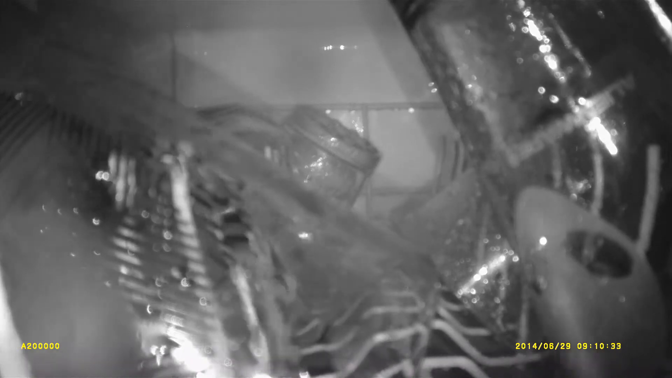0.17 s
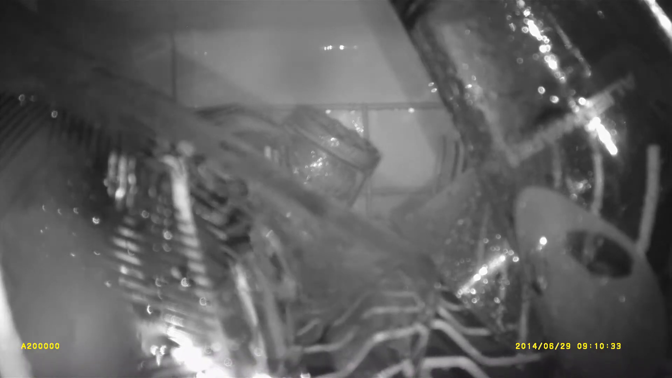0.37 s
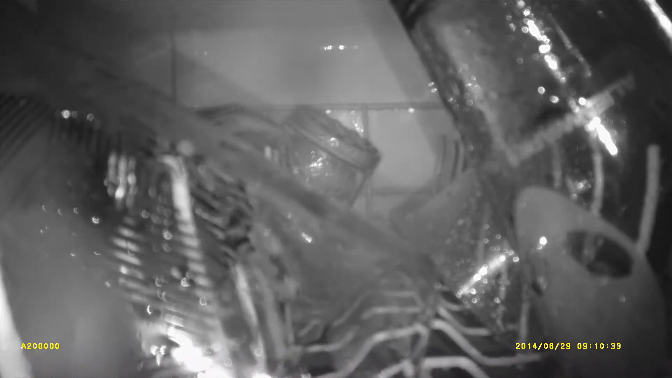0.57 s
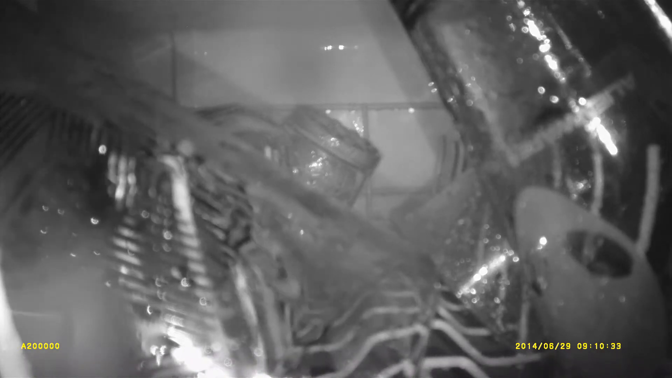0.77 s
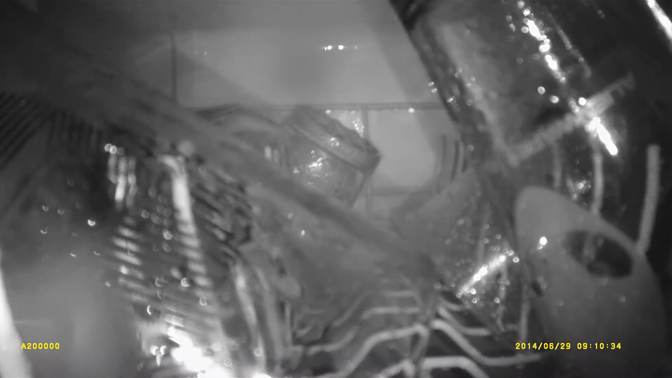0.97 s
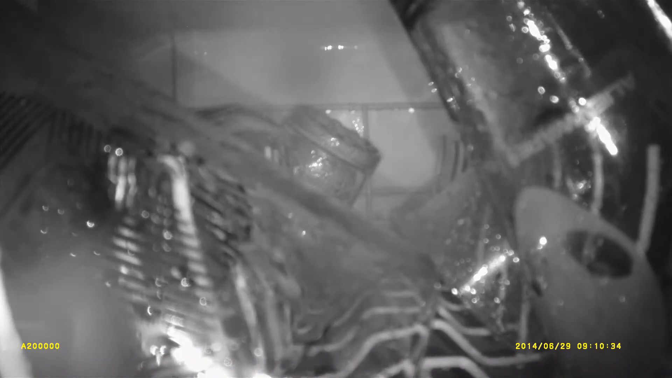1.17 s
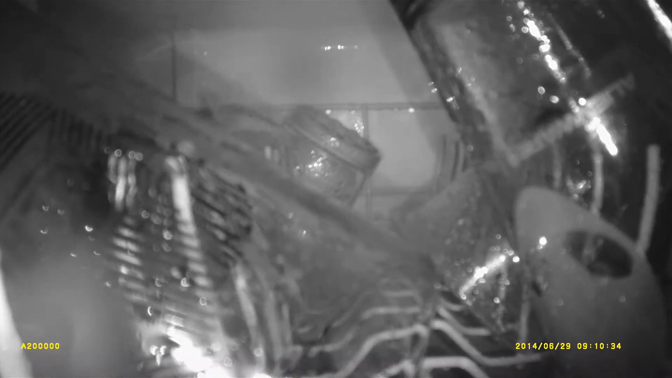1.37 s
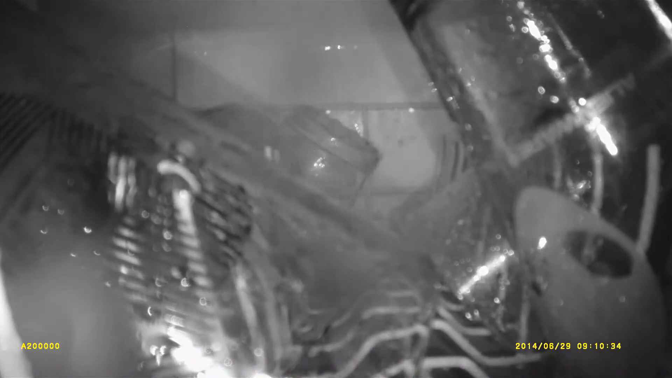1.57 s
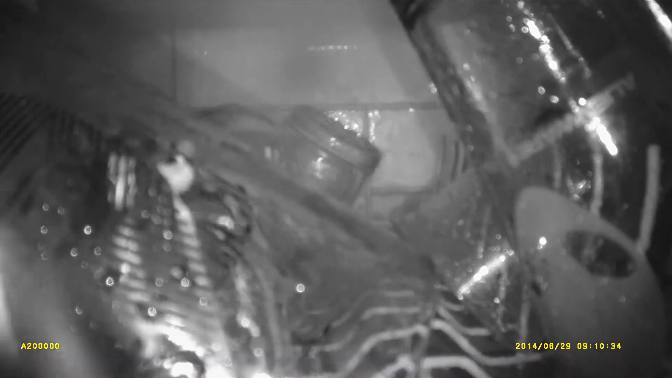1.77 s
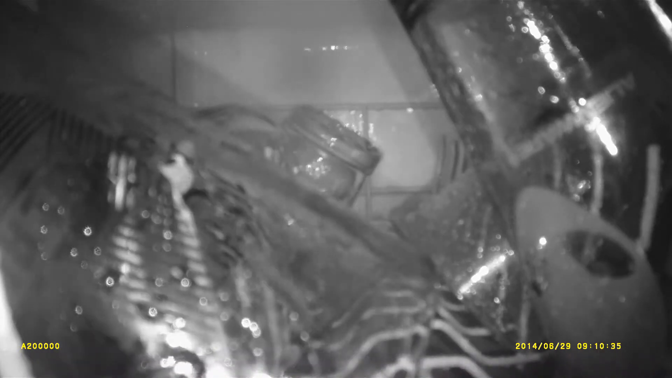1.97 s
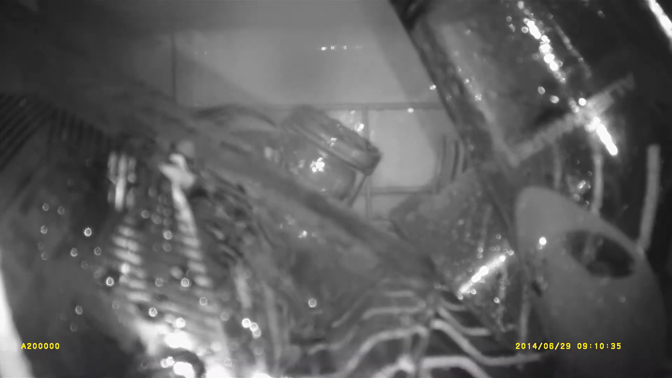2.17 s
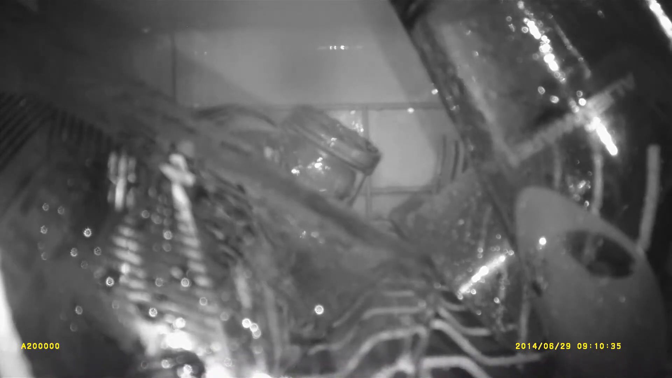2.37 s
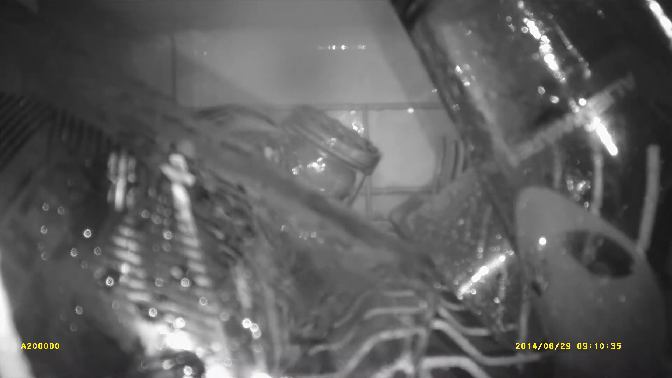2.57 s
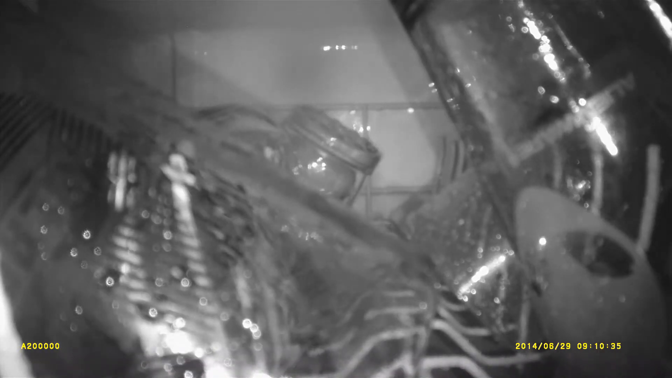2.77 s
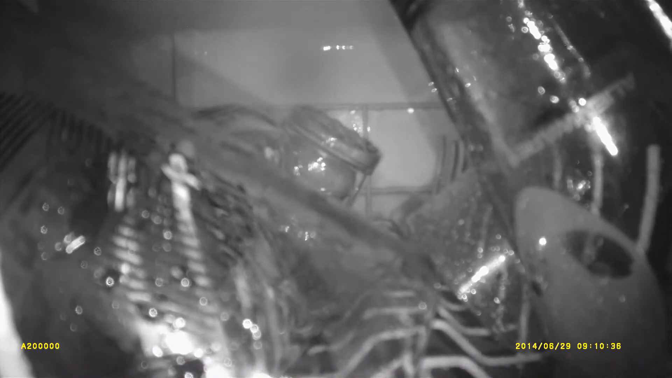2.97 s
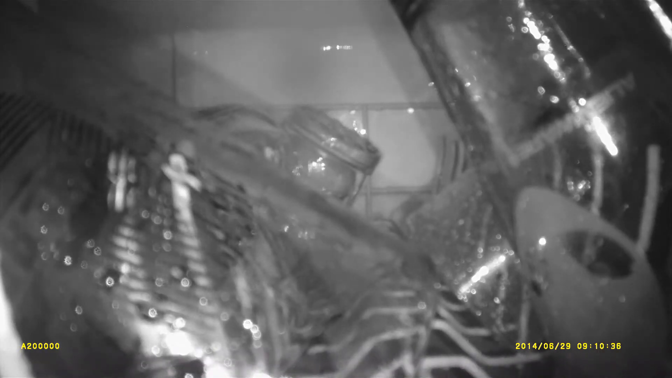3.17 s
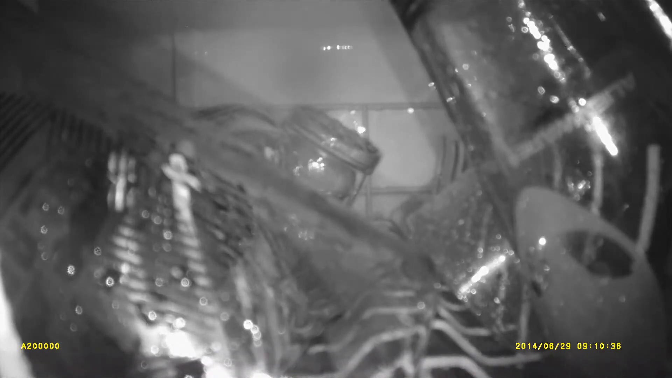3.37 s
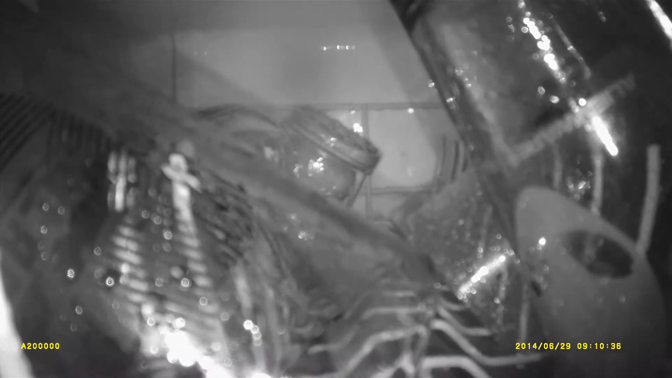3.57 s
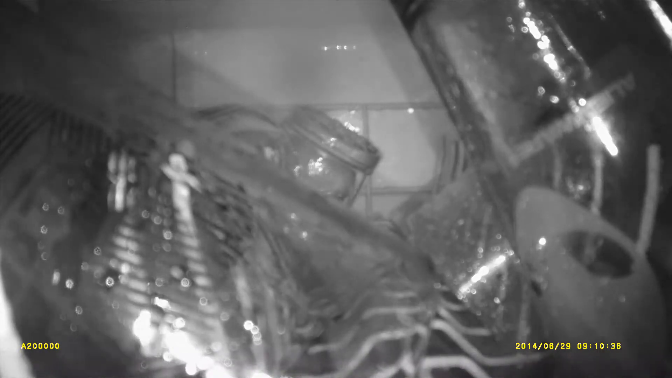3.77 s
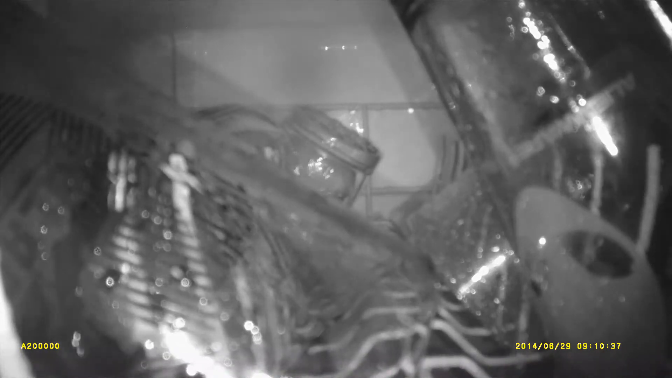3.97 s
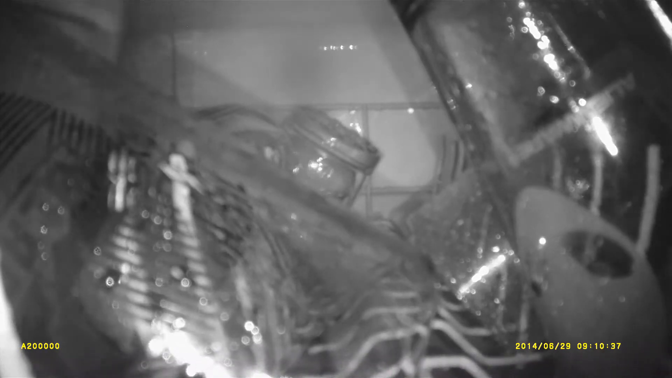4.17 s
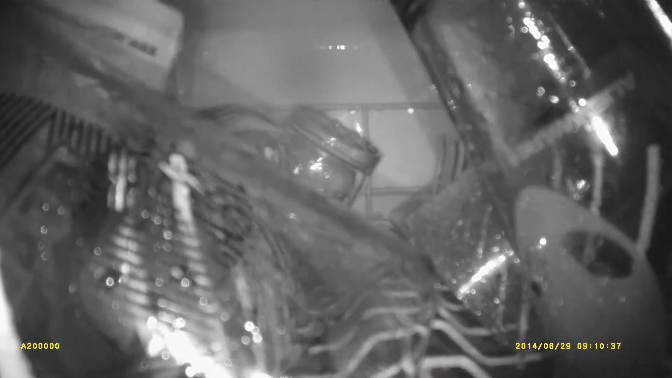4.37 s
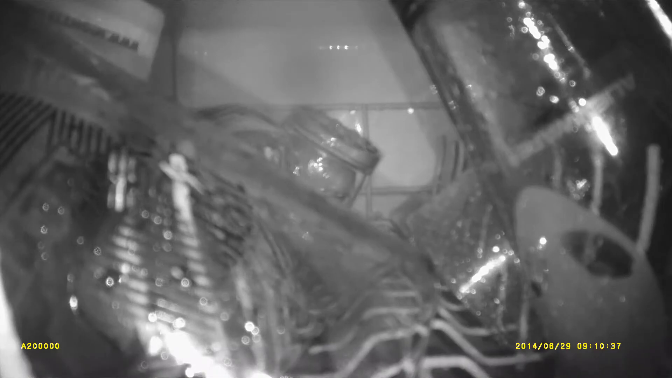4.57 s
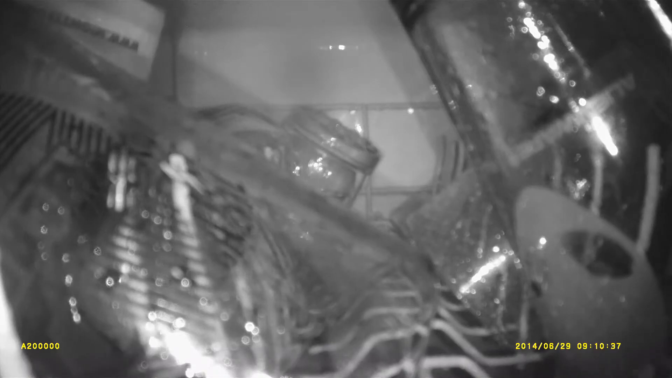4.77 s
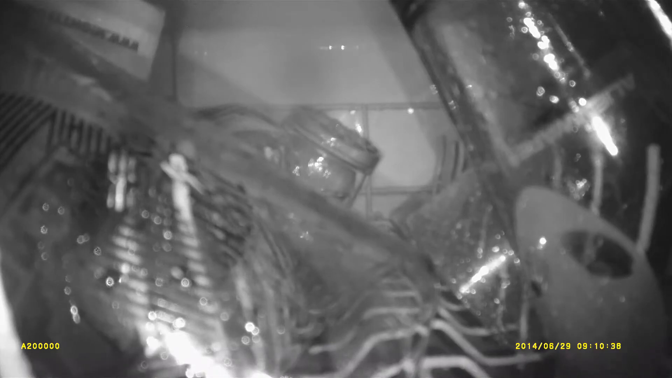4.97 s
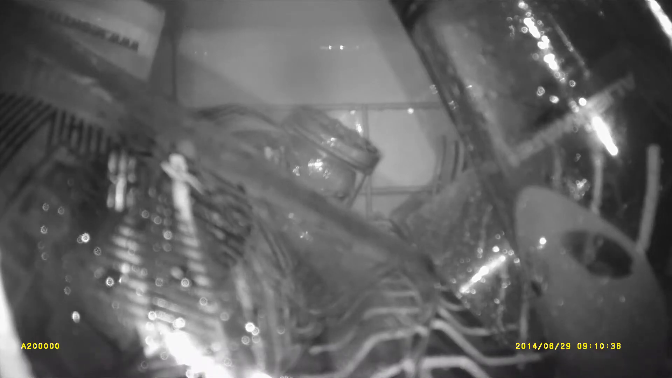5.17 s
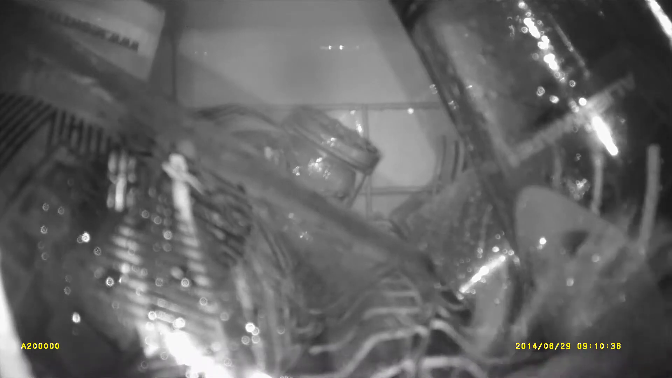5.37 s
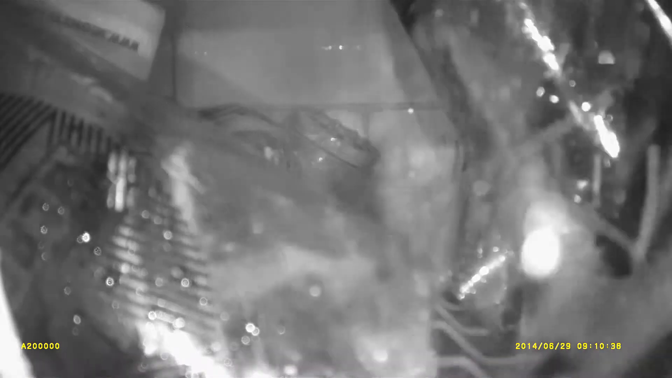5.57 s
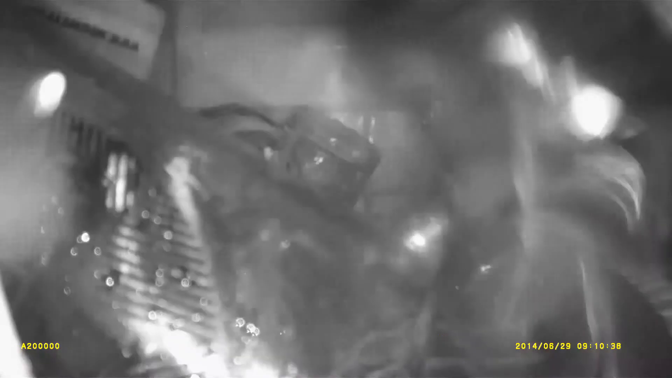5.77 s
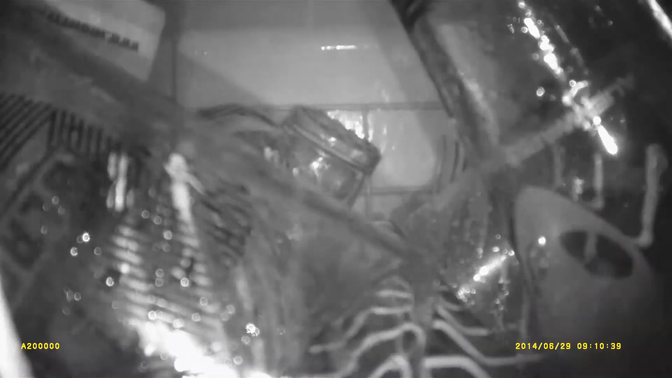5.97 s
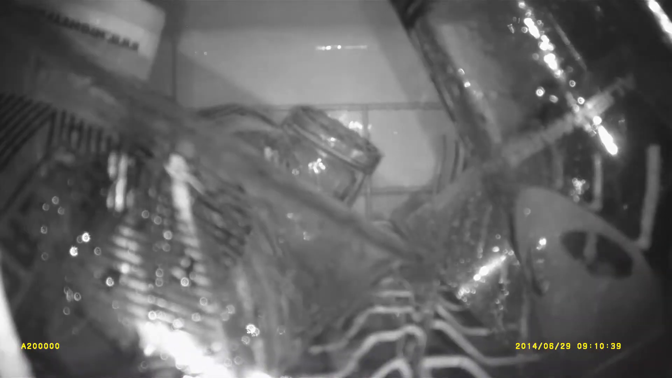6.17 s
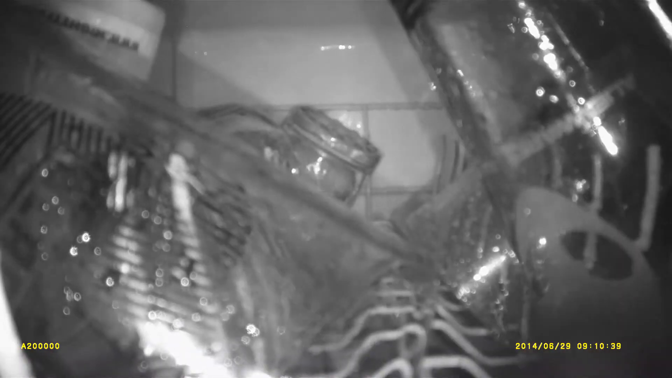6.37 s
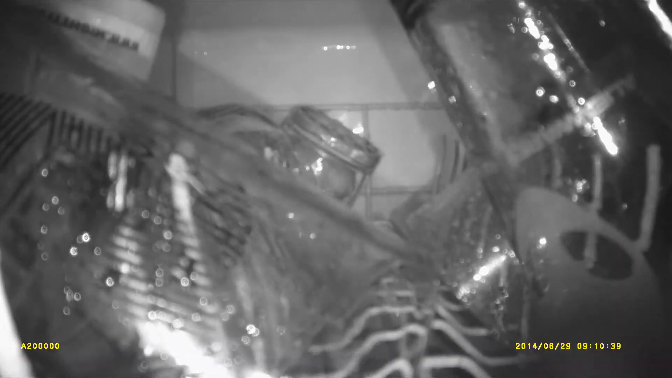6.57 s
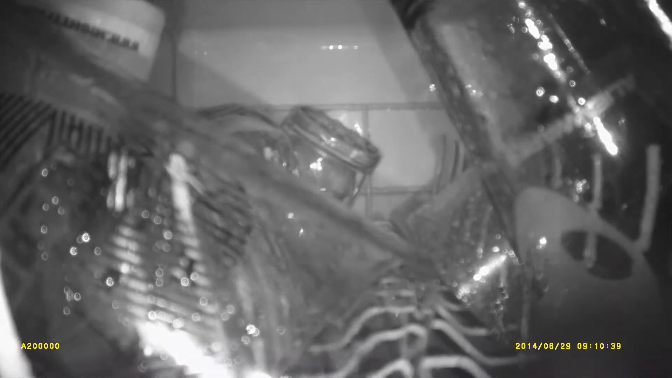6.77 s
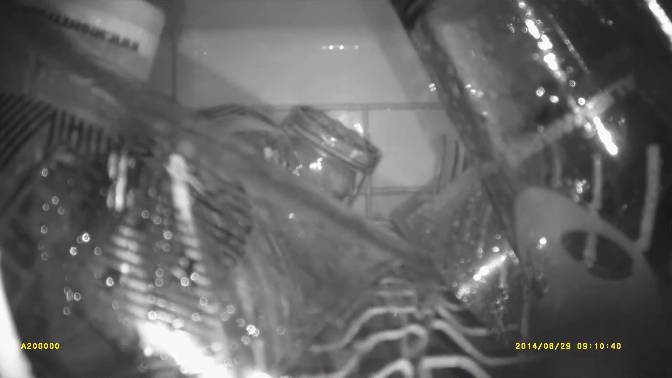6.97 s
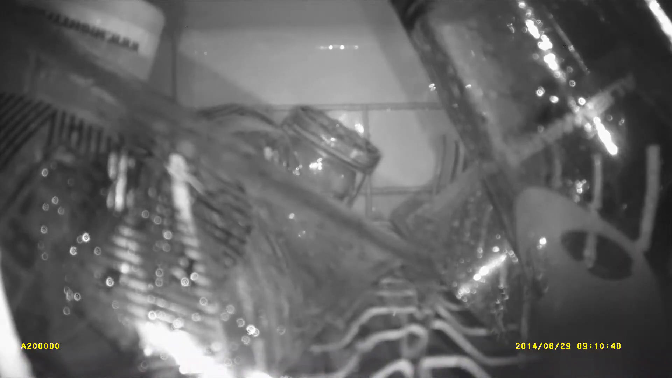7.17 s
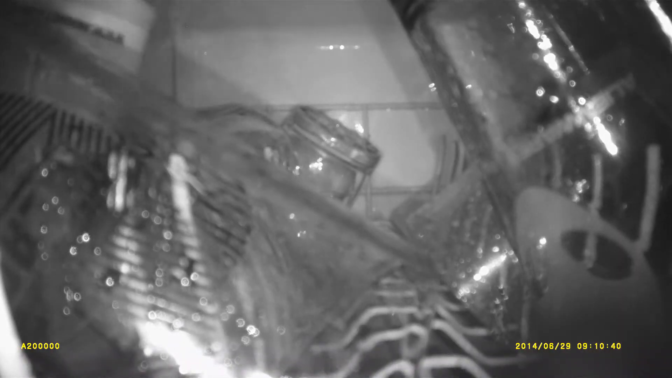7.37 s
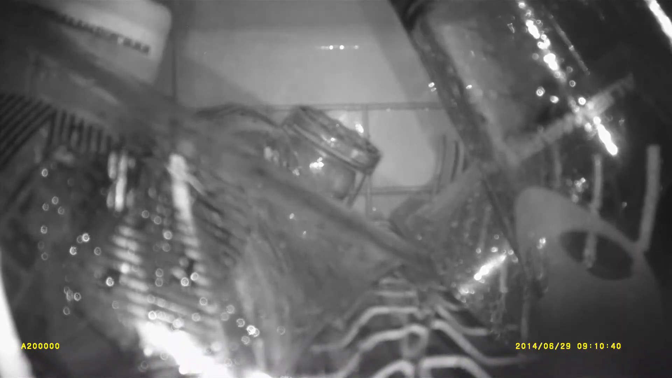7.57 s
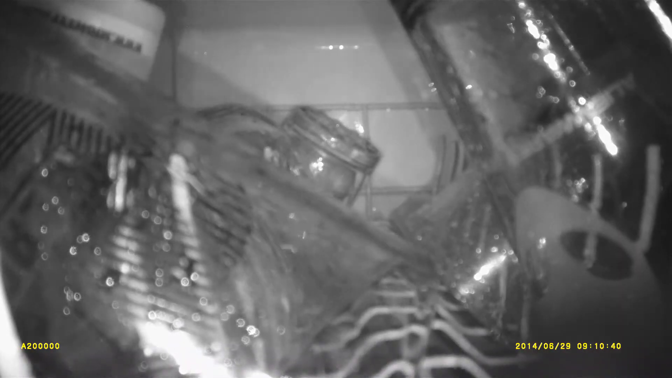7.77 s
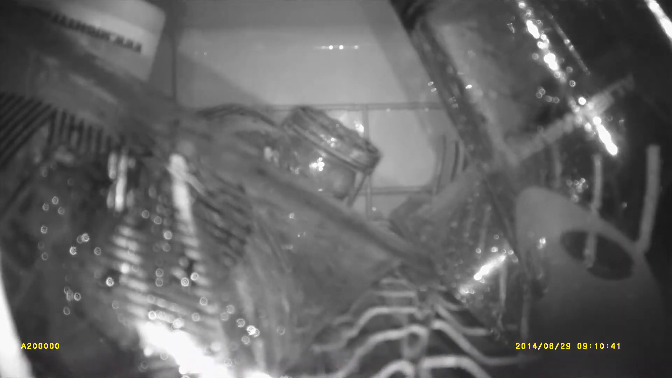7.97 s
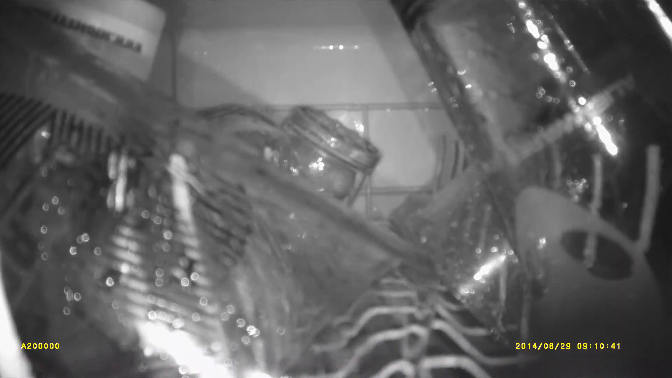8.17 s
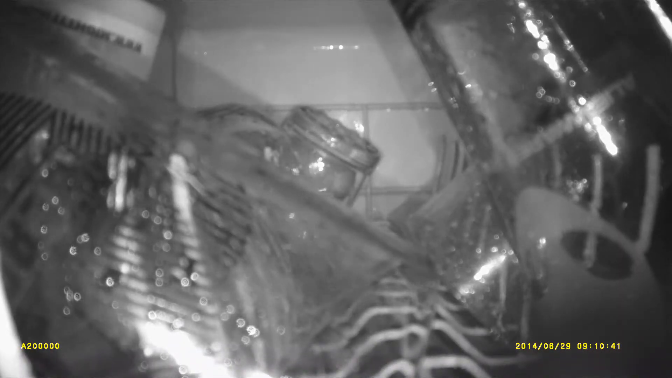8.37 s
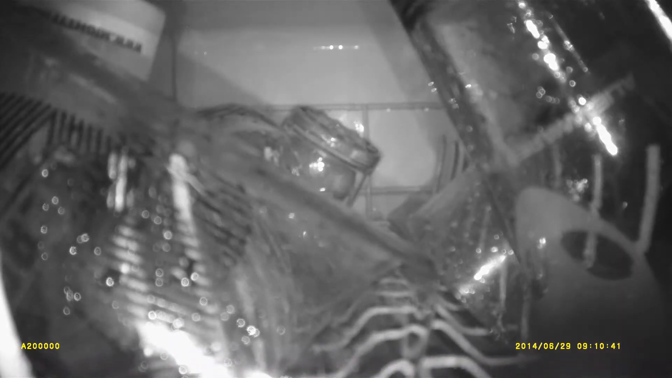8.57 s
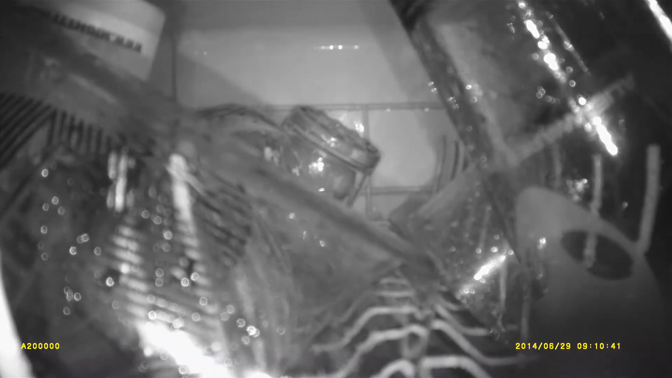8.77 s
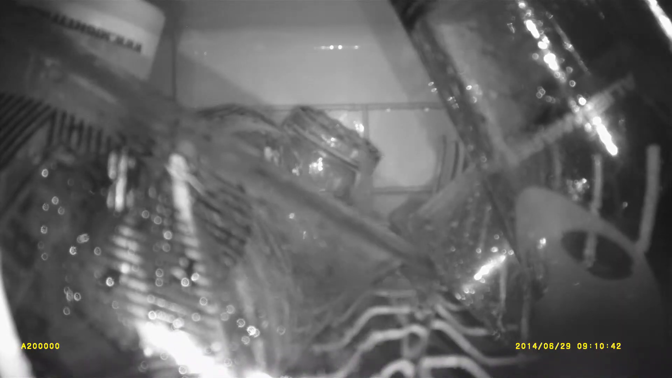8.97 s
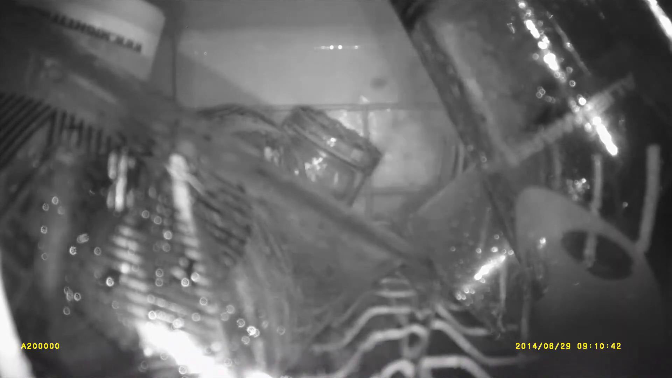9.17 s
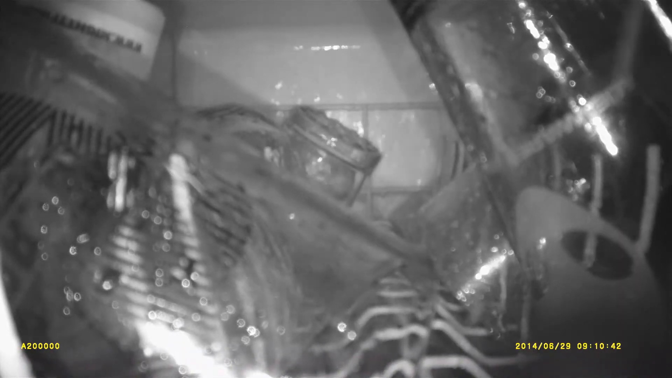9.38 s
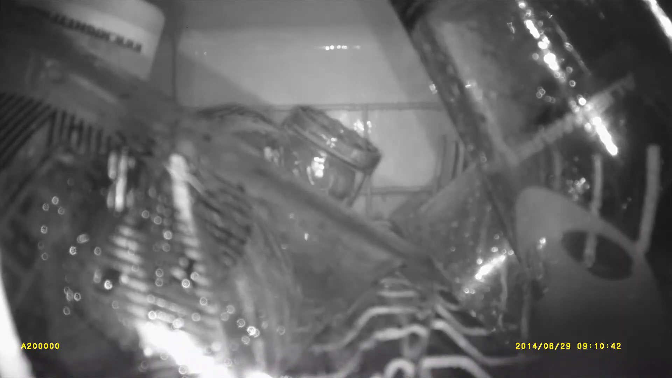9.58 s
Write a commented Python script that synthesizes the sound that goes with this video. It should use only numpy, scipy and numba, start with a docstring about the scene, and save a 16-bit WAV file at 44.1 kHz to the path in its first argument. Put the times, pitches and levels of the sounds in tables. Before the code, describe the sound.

Inside a running dishwasher, a pump hums while spray surges about every two seconds, with splashes and sharp knocks on the microphone.

```python
"""A dishwasher's pump motor hums at twice the mains and beats against its own shaft.
Water drums and patters in the tub, hisses as mist and rings the dishes, swelling each time the spray
arm comes round, with splashes and slaps between. Drops tick on the case of a small camera inside, and
jets knock it hard enough to overload it. Its slow sample-and-hold adds a thin fizz."""
import sys
import numpy as np
from scipy import signal
from scipy.fft import rfft, irfft, next_fast_len
from scipy.io import wavfile
from scipy.ndimage import uniform_filter1d, map_coordinates
from numba import njit

SR = 44100
rng = np.random.default_rng(int(sys.argv[2]) if len(sys.argv) > 2 else 0)


def transcribe(u):
    """Save the signal u as a 16-bit wav file named by the first command-line argument.

    u: samples, shape (n,) or (channels, n), limited to [-1, 1]; the rate is SR.
    q: integer samples, one column per channel.
    """
    v = np.clip(np.atleast_2d(u).T, -1, 1)
    q = np.round(v * 32767).astype(np.int16)
    wavfile.write(sys.argv[1], SR, q)


N = 423801

# Spray arm passes. Each row: peak time, rise and fall in seconds, then the swell in dB of
# drumming, patter, mist, dishes and the trailing jet's mist.
PASSES = [(0.07, .5, 0.8, 3, 4.5, 9, 6, 0), (1.47, .13, 0.26, 9.5, 12, 19, 19, 9),
          (3.68, 0.16, .24, 10, 15, 19.5, 20, 12.5), (5.53, .12, 0.18, 12.5, 18.5, 24, 22, 9.5),
          (7.39, 0.21, 0.25, 9.5, 11, 19, 23, 12), (9.1, 0.19, 0.16, 6, 12, 16.5, 21, 11.5)]
# Tub resonances. Each row: centre in Hz, width in Hz, lift in dB.
TUB_MODES = [(176, 29.4, 7.5), (234.2, 32, 9), (293.6, 21, 9.5), (338, 25, 6), (431.3, 59, 6.5),
             (469.5, 41, 7.5), (633, 63, 9), (740, 27, 9.5), (795, 34, 10.5), (947, 22, 2.5), (1135, 46, 6),
             (1220, 30, 5.5), (1660, 37, 7.5), (1803, 55, 6), (1920, 45, 3), (2387, 67, 6)]
# Jets striking the case. Each row: start in seconds, level in dB, starting pitch in Hz.
JET_KNOCKS = [(1.4045, 22.5, 239.4), (5.527, 7, 101.4), (5.5381, 9, 87.3), (5.5518, 8, 445),
              (5.5616, 15, 295), (5.5751, 16, 665), (5.5885, 5.5, 255), (5.6036, 14, 190.5),
              (5.624, 7, 180), (5.6376, 7.5, 357), (5.6602, 20.5, 375)]


def amp(db):
    """Gain of a level in dB."""
    return 10 ** (np.asarray(db) / 20)


def unit(x):
    """x at rms 1."""
    return x / np.sqrt(np.mean(x ** 2) + 1e-20)


def add(track, start_s, sound):
    """Mix a sound into a track."""
    part = track[round(start_s * SR):][:len(sound)]
    part += sound[:len(part)]


def wobble(rate_hz):
    """Smooth random curve, rate_hz knots a second."""
    knots = rng.standard_normal(int(N * rate_hz / SR) + 4)
    return map_coordinates(knots, [np.arange(N) * rate_hz / SR])


def swell(peak_s, rise_s, fall_s):
    """Peak of height 1; rise and fall are times to 1/e."""
    roundness = 1.248  # 1 pointed, 2 round
    t = np.arange(N) / SR - peak_s
    return np.exp(-np.abs(t / np.where(t < 0, rise_s, fall_s)) ** roundness)


def filtered(x, response):
    """x through response(hz)."""
    size = next_fast_len(N + SR // 2)
    return irfft(rfft(x, size) * response(np.fft.rfftfreq(size, 1 / SR)), size)[:N]


def coloured(x, spectrum, peaks=()):
    """x through a minimum-phase filter: a smooth spectrum with resonances on top."""
    size = 8192
    hz = np.fft.rfftfreq(size, 1 / SR)
    knot_hz, knot_db = np.transpose(spectrum)
    db = np.interp(np.log(hz + 1), np.log(knot_hz), knot_db)
    for centre_hz, width_hz, lift_db in peaks:
        db = db + lift_db / (1 + (2 * (hz - centre_hz) / width_hz) ** 2)
    cepstrum = irfft(np.log(amp(db)))
    cepstrum[1:size // 2] *= 2
    cepstrum[size // 2 + 1:] = 0
    impulse_response = irfft(np.exp(rfft(cepstrum)))
    return signal.fftconvolve(x, impulse_response)[:N]


@njit
def resonate(x, pitch_hz, damping):
    """Resonant low-pass with a moving pitch."""
    step = 2 * np.sin(np.pi * pitch_hz / SR)
    out, low, band = np.zeros(len(x)), 0., 0.
    for i in range(len(x)):
        low += step[i] * band
        band += step[i] * (x[i] - low - damping * band)
        out[i] = low
    return out


def pump():
    """Shaft slip beats against the magnetic hum. Load slows and stills the shaft and lifts the hum."""
    # Motor orders. Each row: multiple of the shaft rate, level in dB relative to the throb.
    shaft_orders = [(1, -3), (2, -12.5), (3, -25.5), (4, -14.5), (5, -15), (7, -26)]
    # Magnetic hum. Each row: multiple of the mains, level in dB.
    hum_harmonics = [(2, -17), (3, -57), (4, -41), (6, -53), (8, -47.5)]
    shaft_hz, sag_hz, throb_db, dip_db = 56.93, 1.1, -20.5, 14
    mains_hz, lift_db, waver_db = 59.98, 1, 0.5
    lead_s = 0.032  # load peaks ahead of each pass
    load = sum(swell(peak_s - lead_s, rise_s=0.1915, fall_s=0.25) for peak_s, *_ in PASSES)
    shaft_phase = 2 * np.pi * np.cumsum(shaft_hz - sag_hz * load) / SR
    mains_phase = 2 * np.pi * mains_hz * np.arange(N) / SR
    throb = sum(amp(db + 0.44 * wobble(3.4)) * np.cos(round(k) * shaft_phase) for k, db in shaft_orders)
    hum = sum(amp(db + lift_db * load + waver_db * wobble(8)) * np.cos(round(k) * mains_phase)
              for k, db in hum_harmonics)
    return hum + amp(throb_db - dip_db * load) * throb


def spray_arm():
    """Levels in dB of drumming, patter, mist and dishes, swelling as the arm comes round."""
    drum_db, patter_db, mist_db, dishes_db = -30, -46, -59.5, -54.5  # jets pointing away
    for peak_s, rise_s, fall_s, drum_up_db, patter_up_db, mist_up_db, dishes_up_db, trail_up_db in PASSES:
        jet = swell(peak_s, rise_s, fall_s)
        trail_db = trail_up_db * swell(peak_s + 0.55, rise_s=0.27, fall_s=0.27)  # weaker, farther jet
        fan = swell(peak_s, 2.47 * rise_s, 0.79 * fall_s)  # mist leads the jet and stops with it
        runoff = swell(peak_s + 0.025, rise_s, 2.05 * fall_s)  # dishes ring on as water runs off
        drum_db += drum_up_db * jet
        patter_db += patter_up_db * jet + 0.15 * trail_db
        mist_db += mist_up_db * fan + trail_db
        dishes_db += dishes_up_db * runoff
    return drum_db, patter_db, mist_db, dishes_db


def impacts(per_s, spread_db):
    """Random droplet impacts of uneven size."""
    hits = rng.random(N) < per_s / SR
    signs = rng.choice([-1, 1], N)
    return hits * signs * amp(spread_db * np.clip(rng.standard_normal(N), -2.5, 2.5))


def gurgling(x, depth_db):
    """Moving water favours changing pitches for a few hundredths of a second each."""
    spectra = signal.stft(x, nperseg=512)[2]
    field = uniform_filter1d(rng.standard_normal(spectra.shape), size=5, axis=0)  # over frequency
    field = uniform_filter1d(field, size=7, axis=1)  # over time
    spectra = spectra * amp(depth_db * unit(field))
    return unit(signal.istft(spectra, nperseg=512)[1][:N])


def spray(drum_db, patter_db, mist_db):
    """Droplets drum on the tub, patter through the case's resonance and hiss as mist."""
    # Droplet spectra. Each row: frequency in Hz, relative level in dB.
    drum_spectrum = [(20, -11), (40, -2), (90, 3), (150, -2.5), (200, -8), (260, -9), (400, -10.5),
                     (520, -16), (680, -27.5), (900, -23.5), (1300, -29.5), (2500, -65.5)]
    patter_spectrum = [(150, -30), (400, -5), (700, -2), (1000, -0.5), (1500, -6.5), (2100, -10.5),
                       (3000, -12), (5500, -24.5)]
    mist_spectrum = [(800, -31), (2000, -1), (2600, -1), (3300, -1), (4500, 0), (5500, -1.5)]
    # Case resonance, shifting as it is splashed. Each row: time in seconds, pitch in Hz.
    case_resonance = [(0, 1400), (1.3, 1330), (1.7, 1590), (5.4, 1586), (5.8, 2010), (6.4, 1880),
                      (9.6, 1853)]
    case_hz = np.interp(np.arange(N) / SR, *np.transpose(case_resonance))
    spurt = wobble(28)  # jets break up unevenly
    drum = unit(coloured(impacts(per_s=3000, spread_db=5.5), drum_spectrum, TUB_MODES))
    patter = coloured(impacts(per_s=3000, spread_db=3), patter_spectrum, TUB_MODES)
    patter = gurgling(resonate(patter, case_hz, damping=0.24), depth_db=2.5)
    mist = coloured(impacts(per_s=6300, spread_db=2), mist_spectrum)
    mist = gurgling(mist, depth_db=2)
    return (amp(drum_db + 1.6 * spurt) * drum
            + amp(patter_db + 1.1 * spurt) * patter
            + amp(mist_db + 1.3 * spurt) * mist)


def dishes(level_db):
    """Soft droplet blows keep the wet dishes ringing."""
    # Dish modes. Each row: centre in Hz, width in Hz, relative level in dB.
    modes = [(590, 62, -5), (718.6, 30, 6.5), (792, 52, 3), (945, 25, -19), (1183, 130, -8.5),
             (1573, 57, -10), (1780, 26, -7.5), (1880, 44, -20)]
    # A droplet's blow. Each row: frequency in Hz, relative level in dB.
    blow_spectrum = [(300, -9), (700, 2.5), (1800, -3.5), (2600, -13), (5000, -24.5)]

    def response(hz):
        return sum((-1) ** k * amp(db) * 1j * hz * width_hz / (mode_hz ** 2 - hz ** 2 + 1j * hz * width_hz)
                   for k, (mode_hz, width_hz, db) in enumerate(modes))
    blows = coloured(impacts(per_s=1500, spread_db=0.5), blow_spectrum)
    return amp(level_db + 2.2 * wobble(20)) * unit(filtered(blows, response))


def bubble_shower(hz, t60_s, count):
    """Tiny bubbles of similar size, each rising in pitch; the shower thins out from about rms 1."""
    out, t = np.zeros(SR // 2), np.arange(SR // 40) / SR
    starts_s = rng.random(count) ** 2.1 * min(t60_s, 0.5) / 2
    pitches_hz = hz * np.exp(0.07 * rng.standard_normal(count))
    for start_s, pitch_hz in zip(starts_s, pitches_hz):
        cycles = pitch_hz * t
        bubble = np.sin(2 * np.pi * cycles * (1 + 3 * t)) * np.exp(-cycles / 7)
        add(out, start_s, amp(-45 * start_s / t60_s) * bubble)
    return out / np.sqrt(np.sum(out ** 2) / (SR * t60_s / 6))


def splashes():
    """Small splashes on the dishes, each a short shower of bubbles."""
    # Each row: start in seconds, level in dB, pitch in Hz, t60 in seconds.
    showers = [(0.29, -60, 4140, 0.31), (1.436, -30, 1416, 0.15), (1.635, -24, 1166, .056),
               (2.009, -52.5, 4920, .14), (2.835, -48.5, 1810, .17), (3.612, -36, 1640, 0.16),
               (5.447, -44, 3000, .04), (5.772, -46.5, 3270, 0.23), (7.925, -50.5, 4030, .14),
               (8.207, -47, 2140, 0.2), (9.06, -33.5, 1810, .09), (9.105, -40, 2210, 0.24)]
    out = np.zeros(N)
    for start_s, db, hz, t60_s in showers:
        add(out, start_s, amp(db) * bubble_shower(hz, t60_s, count=50))
    return out


def ring(hz, t60_s, attack_s, sag_per_s=0):
    """Damped vibration; sag lowers its pitch."""
    t = np.arange(SR // 8) / SR
    phase = 2 * np.pi * hz * t / (1 + sag_per_s * t)
    return np.sin(phase) * amp(-60 * t / t60_s) * (1 - np.exp(-t / attack_s))


def case_strikes():
    """Jets give the case deep knocks that sink in pitch as they ring; drops nudge it and ring it briefly."""
    # Drops. Each row: start in seconds, level in dB, pitch in Hz, nudge in dB relative to the tick.
    drops = [(1.5457, -15.5, 1500, -15), (1.7133, -4, 1480, 6), (1.7477, -19, 1610, -3),
             (2.323, -14.5, 1580, 1), (5.499, -8, 1620, -15.5), (5.544, -7, 4570, -6),
             (5.554, -12.5, 4140, -10), (5.5613, -4, 1900, -6.5), (5.585, -24, 1870, -6),
             (5.6128, -10, 1490, -20), (5.798, -1, 2140, -9), (5.922, -17.5, 1700, 8),
             (6.19, -12, 1590, 14.5), (6.713, -28.5, 4100, -18), (9.061, -23, 1790, -2)]
    knock_cycles, tick_cycles = 4.08, 12.5  # to -60 dB
    out = np.zeros(N)
    crack = ring(hz=1295, t60_s=0.008, attack_s=0.0003)
    for start_s, db, hz in JET_KNOCKS:
        knock = ring(hz, knock_cycles / hz, attack_s=0.0011, sag_per_s=29)
        add(out, start_s, amp(db) * (knock + amp(-19) * crack))
    nudge = ring(hz=170, t60_s=0.0049, attack_s=0.0001)
    nudge += amp(-17) * ring(hz=1050, t60_s=0.01, attack_s=0.00032)
    for start_s, db, hz, nudge_db in drops:
        tick = ring(hz, tick_cycles / hz, attack_s=0.00008)
        add(out, start_s, amp(db) * (tick + amp(nudge_db) * nudge))
    return out


def water_cover():
    """Gain on the water sounds: each jet covers the case for a moment and muffles the spray beyond."""
    dip_db, cover_s = 5, 0.029
    cover, t = np.zeros(N), np.arange(SR // 10) / SR
    for start_s, *_ in JET_KNOCKS:
        add(cover, start_s, np.exp(-(t / cover_s) ** 4))
    return amp(-dip_db * np.minimum(cover, 1))


def slaps():
    """A sheet of water lands on the wall as a quick, dull cluster of impacts."""
    # Each row: start in seconds, level in dB, t60 in seconds.
    sheets = [(1.44, -16.5, 0.2), (1.635, -17.5, 0.13), (3.842, -16.5, .18), (3.877, -8.5, .14),
              (4.166, -18.5, 0.24), (4.333, -15, 0.28), (5.572, -8, 0.26), (5.635, -10, .11),
              (7.485, -9.5, 0.097), (7.551, -16, 0.1)]
    # Slosh spectrum. Each row: frequency in Hz, relative level in dB.
    slosh_spectrum = [(40, -25), (130, 2), (240, -3), (450, -1.5), (700, -15.5), (1100, -13), (1700, -23.5),
                      (2300, -40), (5500, -40)]
    attack_s = 0.0013
    envelope, t = np.zeros(N), np.arange(SR // 3) / SR
    for start_s, db, t60_s in sheets:
        add(envelope, start_s, amp(db - 60 * t / t60_s) * (1 - np.exp(-t / attack_s)))
    slosh = coloured(impacts(per_s=3500, spread_db=1.5), slosh_spectrum, TUB_MODES)
    return envelope * unit(slosh)


def scene():
    """Pump, water and strikes on the case, in mono."""
    drum_db, patter_db, mist_db, dishes_db = spray_arm()
    water = spray(drum_db, patter_db, mist_db) + dishes(dishes_db) + slaps() + splashes()
    return (pump() + water_cover() * water + case_strikes())[None]


def record(dry):
    """The camera overloads and holds each slow sample, mirroring the sound around its sampling rate."""
    band_hz, hold_hz, top_hz = 5400, 12000, 15600
    narrow = filtered(dry[0], lambda hz: 1 / np.sqrt(1 + (hz / band_hz) ** 36))
    clipped = filtered(np.clip(narrow, -1, 1), lambda hz: hz < hold_hz / 2)
    mirrored = clipped * (1 + 2 * np.cos(2 * np.pi * hold_hz * np.arange(N) / SR))
    held = filtered(mirrored, lambda hz: np.sinc(hz / hold_hz))
    return filtered(held, lambda hz: 1 / np.sqrt(1 + (hz / top_hz) ** 80))[None]


dry = scene()
out = record(dry)
transcribe(out)
```